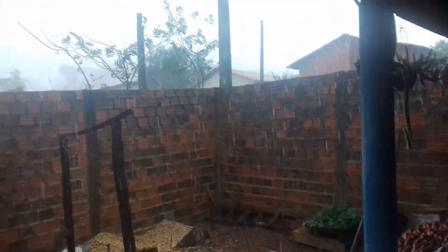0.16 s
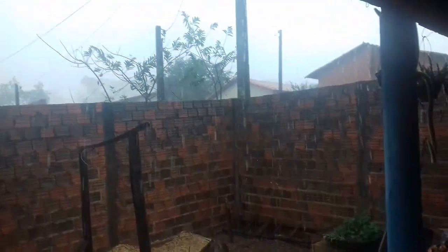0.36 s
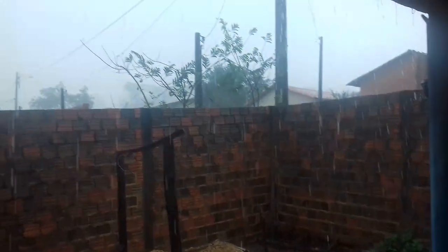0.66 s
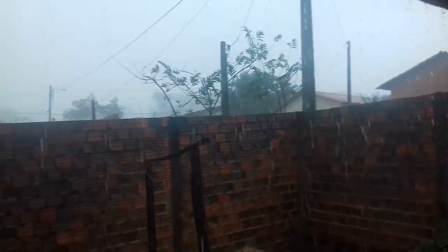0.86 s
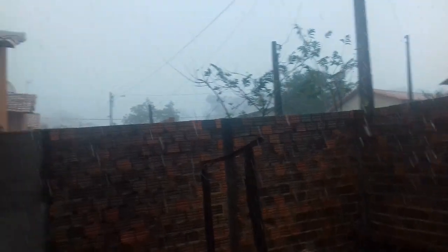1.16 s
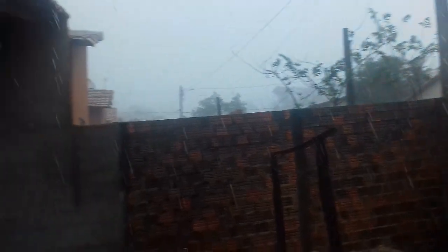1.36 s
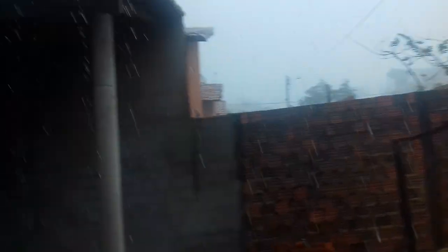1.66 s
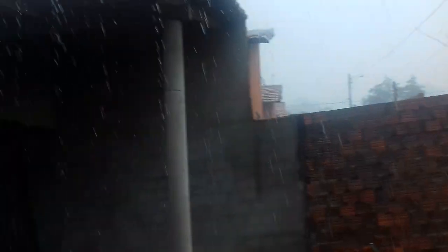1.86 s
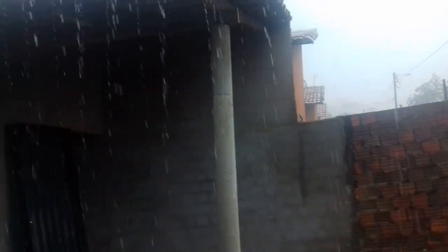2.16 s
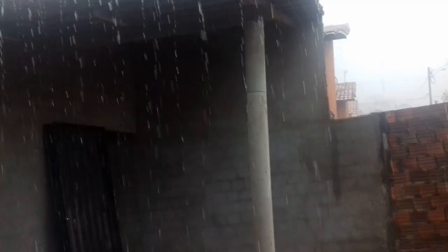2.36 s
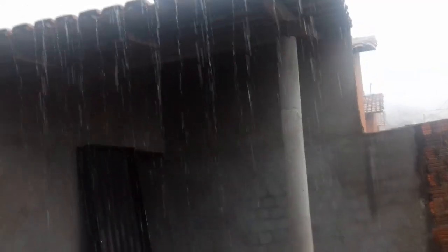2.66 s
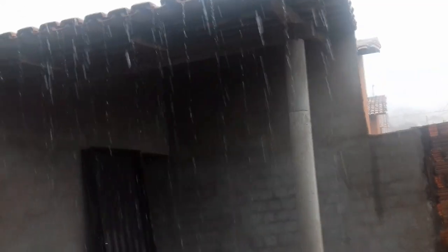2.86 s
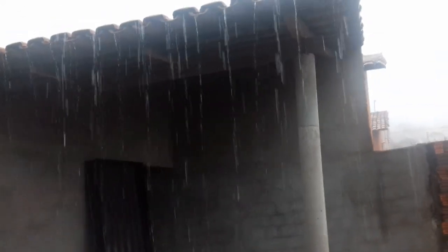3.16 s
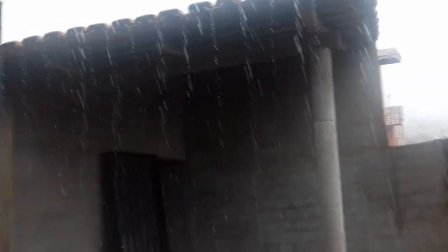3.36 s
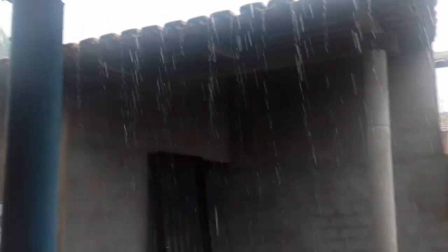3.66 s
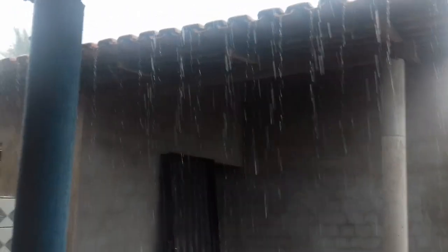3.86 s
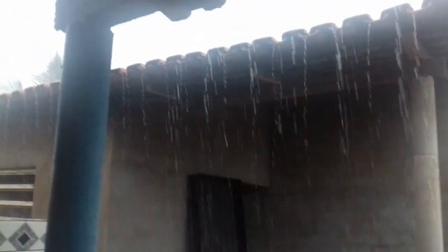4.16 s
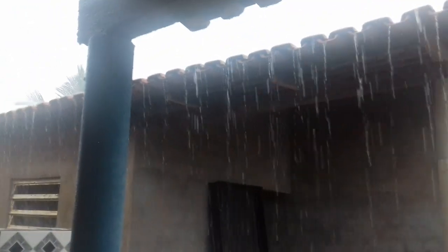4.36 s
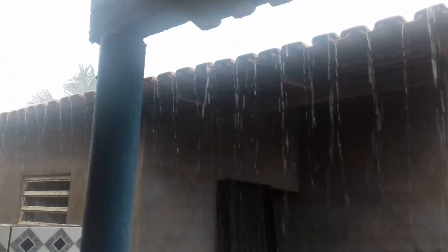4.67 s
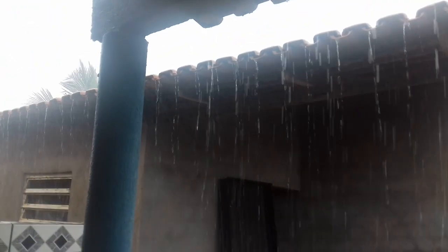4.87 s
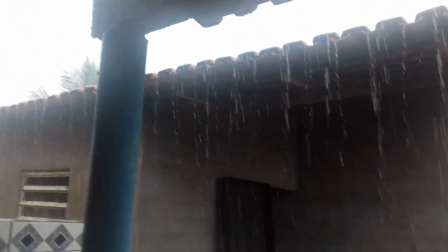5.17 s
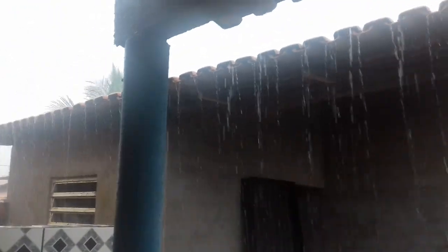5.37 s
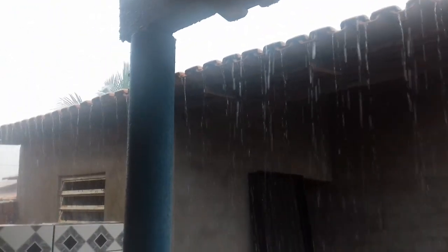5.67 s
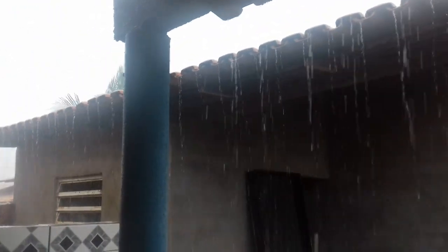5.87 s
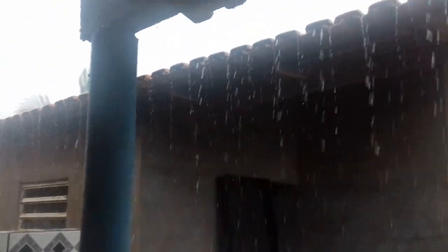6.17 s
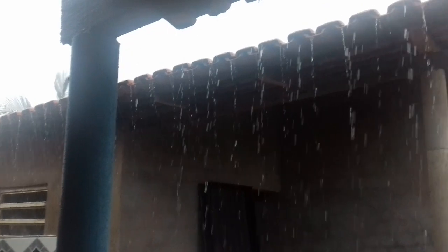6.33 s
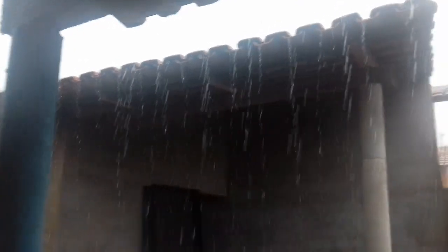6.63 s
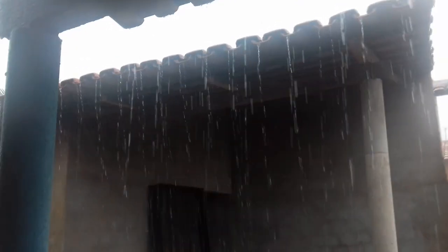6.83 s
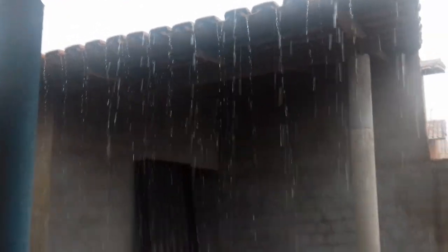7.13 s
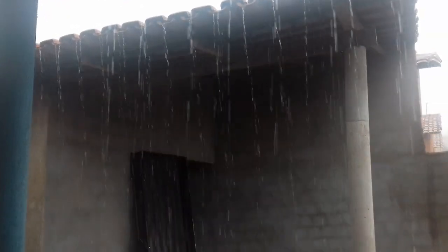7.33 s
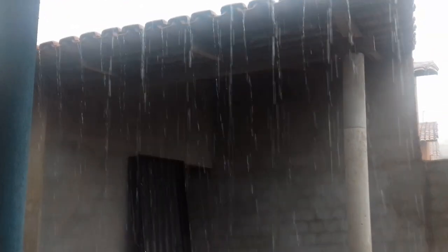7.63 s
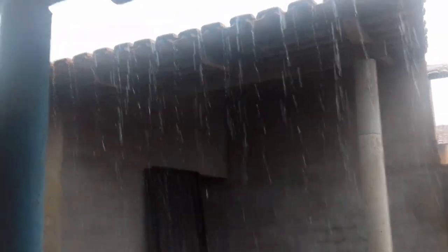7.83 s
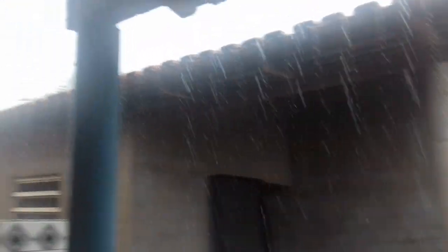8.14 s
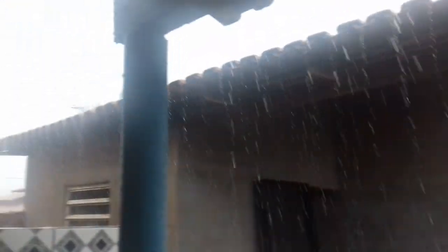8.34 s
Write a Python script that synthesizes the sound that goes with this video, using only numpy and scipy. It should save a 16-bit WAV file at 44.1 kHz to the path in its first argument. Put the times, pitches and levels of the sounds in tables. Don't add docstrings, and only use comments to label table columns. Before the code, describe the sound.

A continuous bright wash of downpour, thickening and thinning slightly as the microphone turns along the roof edge. Brief bursts of fine spray and single drops on tile and in puddles stand out. Muffled wind bumps come early and stop around the middle, then hard drips grow more prominent and distant low thunder rolls softly at the end. Close, mono, cheap handheld microphone outdoors under a porch.

```python
import sys
import numpy as np
from scipy import signal
from scipy.fft import rfft, irfft
from scipy.io import wavfile
from scipy.ndimage import uniform_filter1d

SR = 44100
rng = np.random.default_rng(int(sys.argv[2]) if len(sys.argv) > 2 else 0)


def invert_db(level):
    return 10 ** (np.asarray(level, dtype=float) / 20)


def bounce(signal):
    frames = np.transpose(np.atleast_2d(signal))
    limited = np.clip(frames, -1, 1)
    pcm = np.round(limited * 32767).astype(np.int16)
    wavfile.write(sys.argv[1], SR, pcm)


N = 374850


def evened(x):
    return x / np.sqrt(np.mean(x ** 2) + 1e-20)


def swell(t, middle, length, edge=2):
    return np.exp(-np.log(2) * abs(2 * (t - middle) / length) ** edge)


def narrowed(x, width):
    r = np.exp(-np.pi * width / SR)
    for _ in range(2):
        x = signal.lfilter([1 - r], [1, -r], x)
    return x


def add(mix, s, sound):
    part = mix[round(s * SR):][:len(sound)]
    part += sound[:len(part)]


def coloured(x, points):
    hz = np.fft.rfftfreq(len(x), 1 / SR)
    f, db = np.transpose(points)
    spectrum_db = np.interp(np.log(hz + 1), np.log(f + 1), db)
    return evened(irfft(rfft(x) * invert_db(spectrum_db), len(x)))


def impacts(per_s, spread_db):
    size = invert_db(spread_db * np.minimum(rng.exponential(1, N), 5))
    return size * (rng.random(N) < per_s / SR)


def droplets(per_s, spread_db, count):
    size = impacts(per_s, spread_db)
    kind, t, out = rng.integers(0, count, N), np.arange(512) / SR, np.zeros(N)
    for k in range(count):
        soft_noise = uniform_filter1d(rng.standard_normal(len(t)), size=5)
        puff = soft_noise * np.cos(np.pi * SR * t * (k + .5) / count)
        out += signal.oaconvolve(size * (kind == k), evened(puff * invert_db(-60 * t / 0.0072)))[:N]
    return evened(out)


def bubbles(per_s, spread_db, count):
    clumps = invert_db(3.5 * evened(uniform_filter1d(rng.standard_normal(N), size=3000)))
    size = impacts(clumps * per_s, spread_db)
    kind, t, out = rng.integers(0, count, N), np.arange(1024) / SR, np.zeros(N)
    for k, hz in enumerate(np.geomspace(1050, 2500, count)):
        turns = hz * t * (1 + 5.2 * t)
        ring = np.sin(2 * np.pi * turns) * invert_db(-3.5 * turns)
        out += signal.oaconvolve(size * (kind == k), ring)[:N]
    return evened(out)


def patchy(shape, over_hz, over_time):
    return evened(uniform_filter1d(uniform_filter1d(rng.standard_normal(shape), over_hz, 0), over_time, 1))


# time in seconds, downpour in dB, mist reaching the turning microphone in dB.
RAIN = [(0, -23, -2.5), (.7, -23.5, -1), (1.3, -23.5, 1.5), (2.0, -23, 1.5), (2.6, -22, 4), (3.2, -22, 3),
        (3.5, -21.5, 2), (3.9, -22.5, 1), (4.3, -22.5, 1.5), (5.0, -21.5, 0.5), (5.7, -21.5, 0.5),
        (6.5, -22.5, -1), (7.2, -22, -1), (7.9, -21.5, -1.5), (8.5, -21, 0)]
# pitch in Hz, level in dB per Hz.
WASH = [(50, -32), (130, -21.5), (200, -19.5), (340, -17), (1100, -10.5), (2000, -11), (3000, -13.5),
        (3800, -12), (4600, -14), (5500, -15.5), (6500, -18.5), (9000, -18), (12000, -15.5), (16000, -13.5)]
# middle in seconds, rise in dB.
SURGES = [(0.04, 2.7), (0.22, -2.5), (0.38, 1), (0.81, 0), (1.05, 3.5), (1.79, 1.4), (2.1, -1.4), (2.36, 2),
          (2.76, -2.2), (3.04, 0.5), (3.36, -2), (3.55, 1), (4.44, -1), (4.63, -0.7), (4.81, 0.8),
          (5.0, -1.3), (5.11, 1.2), (5.62, -0.8), (5.74, 3.5), (6.2, 1), (6.28, 2.8), (6.35, -1),
          (6.42, -1.4), (6.66, -1.5), (7.0, 1.8), (7.16, 1.5), (7.3, -1.5), (7.7, 0.5), (8.01, 1),
          (8.45, -2.5)]


def downpour():
    grain = evened(rng.standard_normal(N) + 0.36 * droplets(per_s=1500., spread_db=3.5, count=11))
    hz, t, z = signal.stft(coloured(grain, WASH), SR, nperseg=512, noverlap=384)
    s, rain_db, mist_db = np.transpose(RAIN)
    mean_db = -22.5
    change_db = np.interp(t, s, rain_db) - mean_db
    mist_db = np.interp(t, s, mist_db)
    surge_db = sum(db * swell(t, middle, 0.053) for middle, db in SURGES)
    low = np.clip((3300 - hz) / 900, 0, 1)[:, None]
    high = np.clip((hz - 5600) / 1800, 0, 1)[:, None]
    top = np.clip((hz - 9800) / 2500, 0, 1)[:, None]
    slap_db = change_db + 0.26 * surge_db + 1.2
    fine_db = 0.14 * change_db + 0.25 * surge_db
    fine_db = fine_db + (1 - top) * (0.4 * mist_db + 1.5) + top * (mist_db + 0.8)
    field_db = mean_db + (1 - low - high) * (change_db + surge_db) + low * slap_db + high * fine_db
    field_db = field_db + 0.5 * patchy(z.shape, 8, 24)
    field_db = field_db + (0.25 + .7 * high) * patchy(z.shape, 60, 12)
    wash = signal.istft(z * invert_db(field_db - 3.0), SR, nperseg=512, noverlap=384)[1][:N]
    return wash + invert_db(-45.0) * bubbles(per_s=160., spread_db=2.5, count=10)


def eddy(hz, width):
    turn = np.exp(2j * np.pi * hz * np.arange(N) / SR)
    slow = narrowed(rng.standard_normal(N) / turn, width)
    strength = np.sqrt(narrowed(abs(slow) ** 2, 52.0) + 1e-9)
    return evened((slow / strength * turn).real)


# middle in seconds, level in dB, length in seconds.
PUFFS = [(0.074, -44, 0.035), (.22, -52, .05), (0.421, -38, 0.024), (0.517, -40, 0.055),
         (0.687, -51, 0.044), (0.933, -39.5, 0.13), (1.05, -48, 0.11), (1.33, -54, .12), (1.45, -41, 0.031),
         (1.544, -37, 0.11), (1.664, -39, .04), (1.733, -40, 0.054), (1.86, -44, .04), (1.947, -39.5, .04),
         (2.02, -49, .08), (2.135, -40, .07), (2.49, -46, .06), (2.561, -36.5, 0.046), (2.743, -42, 0.079),
         (2.906, -34, 0.05), (2.997, -32, 0.022), (3.067, -38, .04), (3.245, -46, .08), (3.62, -57, .2),
         (4.05, -47, 0.051), (4.15, -41, .06), (4.24, -43, 0.037), (4.323, -48, 0.048), (4.41, -47, .05),
         (4.61, -48, 0.046)]


def wind():
    edge = 4.3
    t = np.arange(round(PUFFS[-1][0] * SR) + SR // 2) / SR
    gust = sum(invert_db(db) * swell(t, s, length, edge) for s, db, length in PUFFS)
    gust = gust + invert_db(-60.5) * swell(t, 0, 6.2, edge)
    return np.pad(gust, (0, N - len(t))) * (eddy(129, 160.0) + invert_db(-5) * eddy(70, 76.0))


# start in seconds, peak in dB.
SPRAYS = [(0.1096, -32), (0.2902, -25), (0.8834, -27), (0.9997, -20), (1.1697, -23), (1.2281, -26),
          (1.3319, -24), (1.3568, -22), (1.44, -26), (1.515, -21), (1.8891, -28), (1.9874, -25),
          (2.0522, -25), (2.119, -24), (2.147, -20), (2.3266, -29), (2.821, -23), (2.9302, -25),
          (3.1213, -28), (3.5069, -25), (3.667, -22), (4.7701, -27), (5.5987, -27), (5.8641, -34),
          (5.8965, -33), (6.1908, -31), (6.77, -25), (7.6515, -29), (8.1279, -33), (8.3868, -28)]


def sprays():
    t, out = np.arange(4096) / SR, np.zeros(N)
    fine = signal.butter(2, 6500, "high", fs=SR, output="sos")
    rise = 1 - np.exp(-t / .0012)
    for s, db in SPRAYS:
        spray = signal.sosfilt(fine, rng.standard_normal(len(t)))
        add(out, s, invert_db(db + 4.0 - 60 * t / 0.07) * rise * spray)
    return out


# start in seconds, peak in dB.
TICKS = [(0.701, -6), (0.8594, -14), (0.997, -6), (1.0367, -8), (2.147, -14), (2.3444, -9), (2.5193, -5),
         (2.607, -7), (3.033, -5), (3.4066, -9), (3.5554, -10), (3.7585, -8), (4.0473, -10), (5.06, -4),
         (5.1966, -6), (5.2709, -6), (5.643, -8), (5.8531, -15), (6.2906, -9), (6.458, -10), (6.533, -6),
         (6.708, -9), (6.8843, -5), (6.9247, -3), (7, -4), (7.169, -4), (7.6505, -3), (7.6977, -1),
         (8.0143, -4), (8.1319, -3)]


def ticks():
    out = np.zeros(N)
    band = signal.butter(3, [1600, 5800], "band", fs=SR, output="sos")
    blow = signal.sosfilt(band, signal.unit_impulse(4096, 30))
    for (s, db), (delay, share) in zip(TICKS, rng.random((len(TICKS), 2))):
        add(out, s, invert_db(db + 5.5) * blow)
        add(out, s + 0.000966 + 0.00203 * delay, invert_db(db + 8.0) * share * blow)
    return out


# start in seconds,
# peak in dB, ring pitch in Hz.
RINGING_DROPS = [(0.9278, -23, 2150), (1.5145, -21, 1760), (1.826, -21, 2920), (2.4046, -14, 1440),
                 (2.8554, -24, 1890), (3.3388, -19, 2110), (4.0297, -23, 2040), (4.1579, -17, 2050),
                 (4.7192, -23, 1950), (4.9092, -17, 1930), (4.9881, -19.5, 1880), (5.4929, -21, 1890),
                 (5.5588, -19, 2050), (5.7603, -21, 2040), (5.9703, -22, 1890), (6.1125, -24, 2020),
                 (6.2821, -21, 2020), (6.3215, -24, 2460), (6.4587, -26, 2160), (7.1102, -24, 1810),
                 (8.2247, -25, 2110),
                 (0.876, -18, 1060), (0.918, -22, 1160), (1.684, -23, 1130), (1.709, -18, 1060),
          (1.903, -18.5, 1100), (2.025, -18.5, 1100), (2.253, -18.5, 1130), (2.599, -19, 1120),
          (2.898, -21, 1160), (2.974, -20, 1220), (3.582, -22, 1120), (5.247, -22, 1240),
          (5.515, -21, 1390), (5.761, -24, 1290), (6.535, -20, 1050), (6.77, -19, 1060), (7.386, -20, 1150),
          (7.768, -21, 1100), (7.965, -22, 1160)]


def plops_and_knocks():
    t, out = np.arange(4096) / SR, np.zeros(N)
    rise = 1 - np.exp(-t / 0.00068)
    for s, db, hz in RINGING_DROPS:
        turn = np.exp(2j * np.pi * hz * t)
        splash = evened((narrowed(rng.standard_normal(len(t)) / turn, 500) * turn).real)
        ring = np.sin(2 * np.pi * hz * t * (1 + 2.3 * t))
        add(out, s, invert_db(db - 9 - 60 * t / 0.068) * rise * splash)
        add(out, s, invert_db(db + 3.0 - 60 * t / 0.015) * rise * ring)
    return out


# start in seconds, level in dB, centre in Hz, width in Hz, length in seconds.
SPLATTERS = [(.924, -30.5, 2200, 1100, 0.051), (0.941, -37, 1120, 250, 0.041),
             (1.684, -38, 1130, 300, 0.045), (3.59, -37, 480, 140, 0.032), (4.561, -31, 1230, 1000, .045),
             (7.105, -31, 1700, 1300, 0.017), (6.8, -29, 1400, 1400, 0.04),
             (7.698, -17, 2300, 1700, 0.0015), (6.95, -32, 2600, 500, .04), (6.448, -35.5, 570, 71, 0.038),
             (3.504, -28, 11500, 6000, 0.06), (7.264, -29, 2340, 300, 0.01)]


def splatters():
    t, out = np.arange(4096) / SR, np.zeros(N)
    for s, db, hz, width, length in SPLATTERS:
        turn = np.exp(2j * np.pi * hz * t)
        slow = narrowed(rng.standard_normal(len(t)) / turn, width)
        band = evened((slow / abs(slow + 1e-9) ** .5 * turn).real)
        add(out, s, invert_db(db) * band * np.sin(np.pi * np.clip(t / length, 0, 1)) ** .5)
    return out


def rings(modes):
    t, out = np.arange(N) / SR, np.zeros(N)
    for hz, width, db in modes:
        slow = narrowed(rng.standard_normal(N) + 1j * rng.standard_normal(N), width)
        steady = slow / abs(slow) ** 0.57
        out += invert_db(db) * evened((steady * np.exp(2j * np.pi * hz * t)).real)
    return evened(out)


# pitch in Hz, width in Hz, level in dB.
LONG_WALL = [(97.4, 14, 0), (70, 32, -13), (133, 32, -6)]
# pitch in Hz, width in Hz, level in dB.
SHORT_WALLS = [(182, 12, -1), (212, 31, 1), (155.6, 16, -3), (295, 22, -6)]
# middle in seconds, dB at the long wall, dB at the short walls, length in seconds.
THUNDER = [(5.348, -66, -52, 0.18), (5.7, -58, -49, 0.19), (6.25, -64, -48, 0.22), (6.75, -66, -58.5, 0.51),
           (7.36, -48, -53, 0.21), (7.638, -52.5, -42.5, 0.28), (7.884, -44.5, -42, .18),
           (8.123, -47, -42, 0.19), (8.4, -47, -46, 0.29)]


def thunder():
    t = np.arange(0, N + 64, 64) / SR
    rolls = np.array([swell(t, s, length, 2.1) for s, _, _, length in THUNDER])
    levels = invert_db(np.transpose(THUNDER)[1:3]) @ rolls
    long_wall, short_walls = np.repeat(levels, 64, axis=1)[:, :N]
    return long_wall * rings(LONG_WALL) + short_walls * rings(SHORT_WALLS)


def scene():
    near_drops = sprays() + ticks() + plops_and_knocks() + splatters()
    return np.tile(downpour() + wind() + near_drops + thunder(), (2, 1))


def low_pass(x):
    return signal.sosfilt(signal.butter(12, 16920, fs=SR, output="sos"), x)


def record(dry):
    port_hz, port_q, bass_hz, edge_hz = 4590, 6.6, 60, 15740
    hz = np.fft.rfftfreq(N, 1 / SR)
    u = hz / port_hz
    heard = irfft(rfft(dry) / (1 - u ** 2 + 1j * u / port_q), N)
    heard = signal.sosfilt(signal.butter(2, bass_hz, "high", fs=SR, output="sos"), heard)
    heard = .75 * np.tanh(heard / .75)
    heard = irfft(rfft(heard) * (hz < edge_hz), N)
    return low_pass(heard)


dry = scene()
out = record(dry)
bounce(out)
```